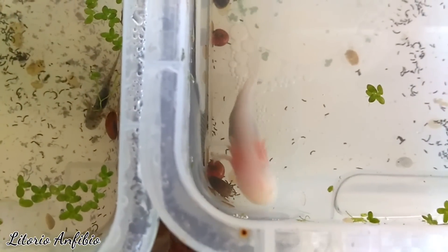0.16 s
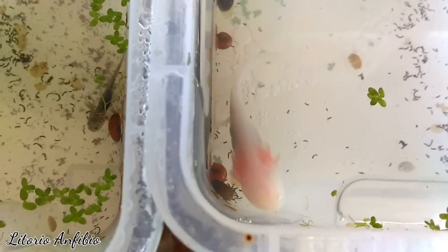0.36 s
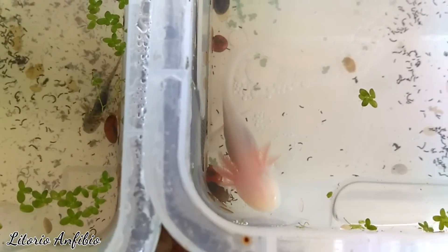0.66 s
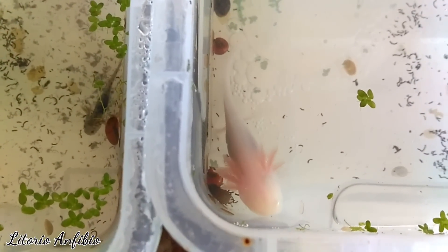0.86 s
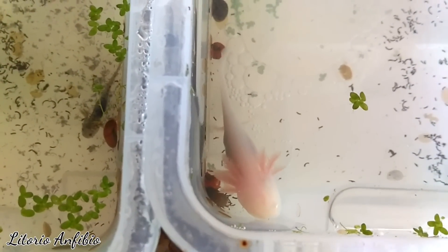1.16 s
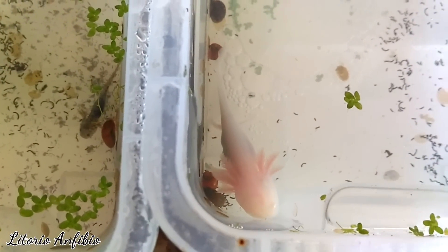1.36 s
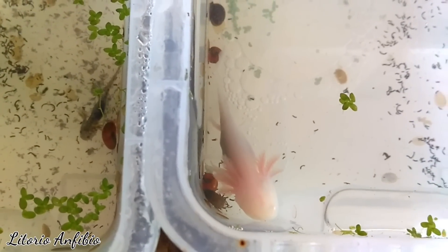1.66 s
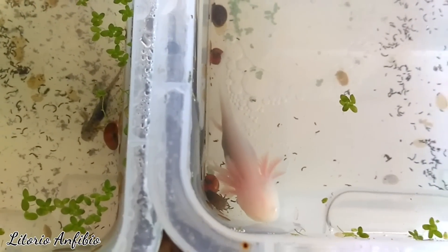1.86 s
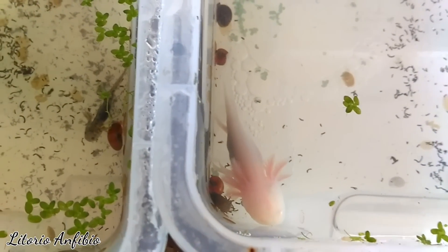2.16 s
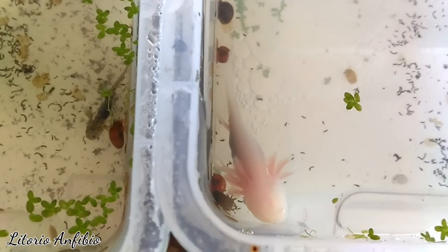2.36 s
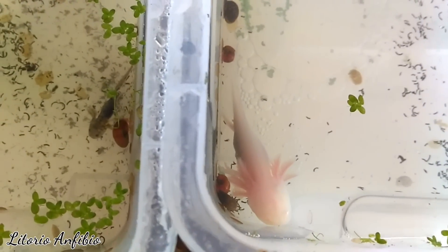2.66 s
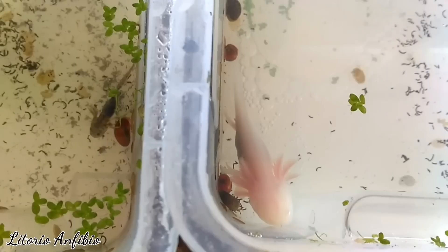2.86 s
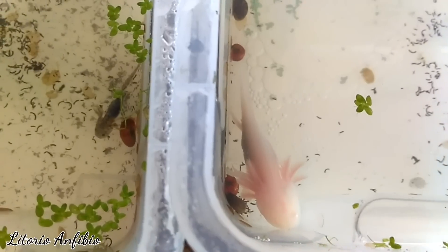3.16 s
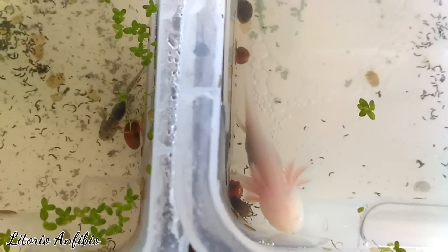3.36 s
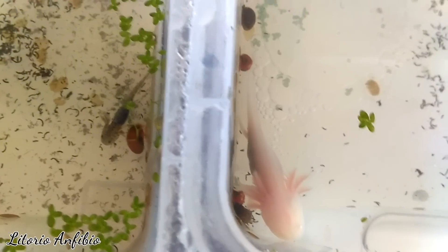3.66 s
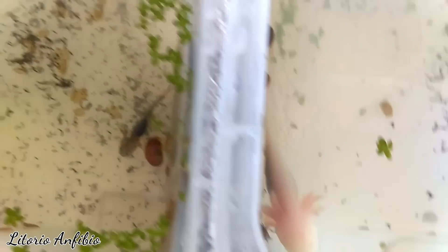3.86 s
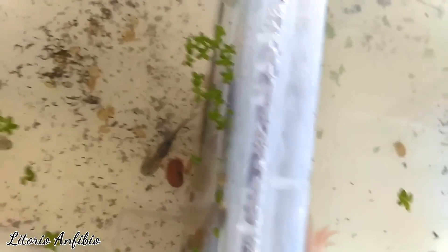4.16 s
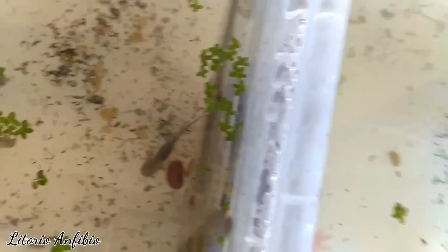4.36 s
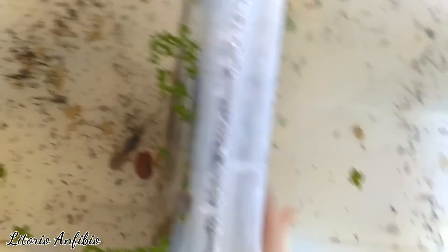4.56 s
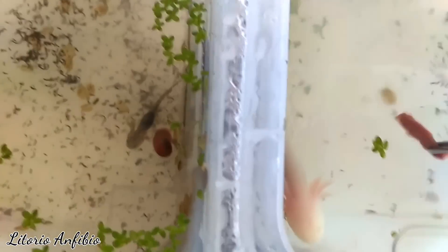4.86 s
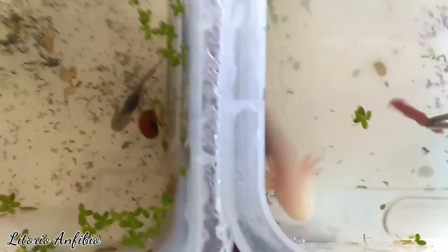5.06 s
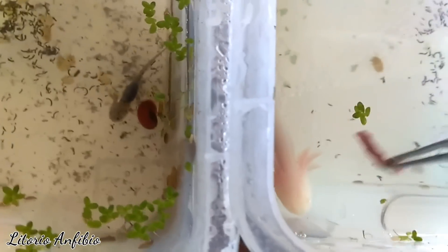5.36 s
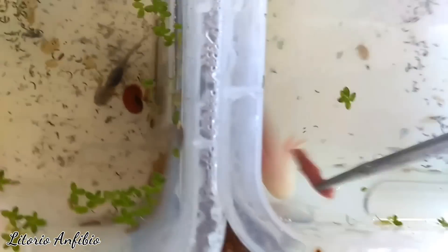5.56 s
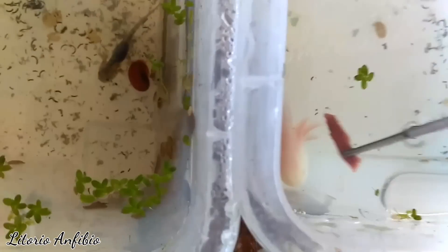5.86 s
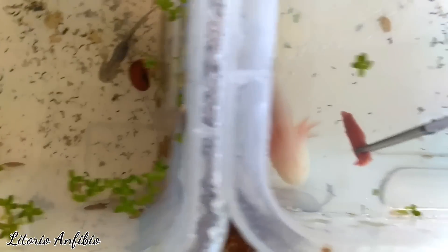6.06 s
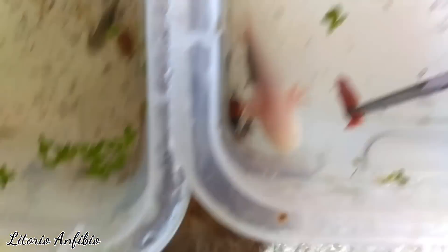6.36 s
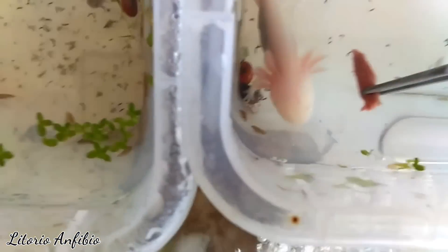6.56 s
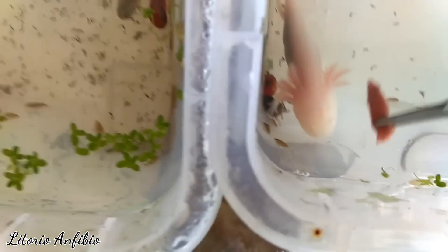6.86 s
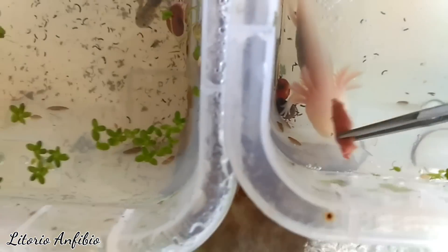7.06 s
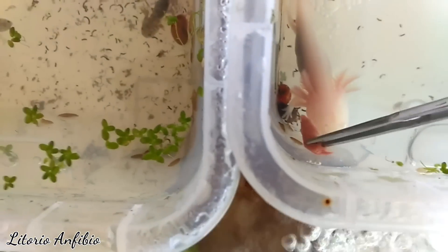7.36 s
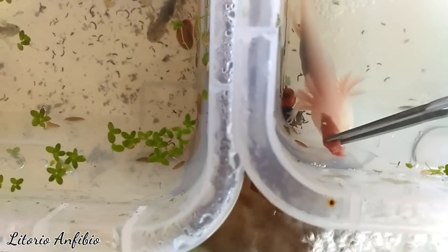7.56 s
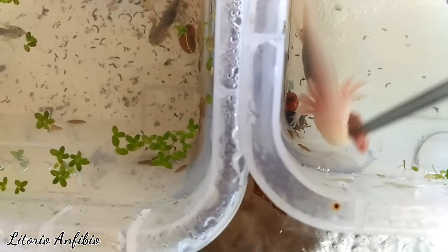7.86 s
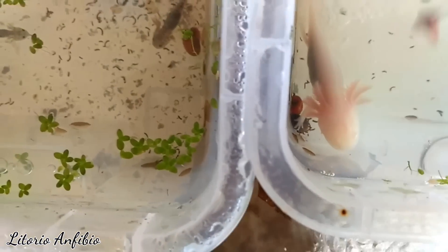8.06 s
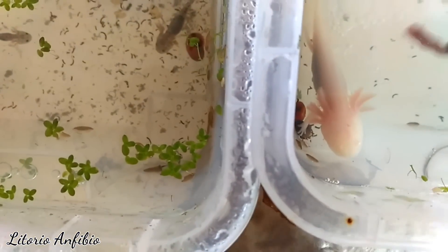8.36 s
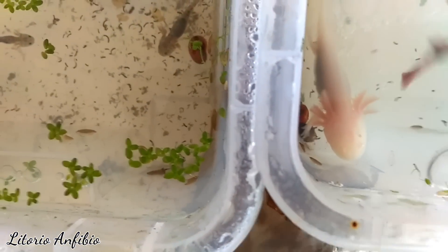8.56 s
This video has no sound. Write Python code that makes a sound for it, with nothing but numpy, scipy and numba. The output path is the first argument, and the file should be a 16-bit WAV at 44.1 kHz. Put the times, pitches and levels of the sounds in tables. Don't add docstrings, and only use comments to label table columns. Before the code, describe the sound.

Water trickles from a filter outlet into a small indoor tank for the whole 8.7 seconds, close to a hand-held phone with two microphones. It is a dense, lively burble: hollow glugs and higher plops ring at two recurring notes, with bright plinks that slide upward and crisp droplet ticks above. The flow comes in small irregular surges, with little deep bass and softened extreme treble. A very faint finger bump falls at about 0.8 s. At 3.6 s steel tweezers make a sharp, short clink, followed within 0.15 s by several much weaker bounces. The trickle continues, a little sparser until nearly 5 s, then busier. Dull low handling thumps come near 4.4 s and, strongest, 5.2 s, with a faint one at 7.5 s. A faint pump hum and quiet room air lie underneath, with a short, dull echo around the water, which runs on to the end.

```python
import sys
import numpy as np
from scipy import signal
from scipy.fft import rfft, irfft
from scipy.io import wavfile
from scipy.ndimage import uniform_filter1d, map_coordinates
from numba import njit

SR = 44100
rng = np.random.default_rng(int(sys.argv[2]) if len(sys.argv) > 2 else 0)


def persist_wave(psi):
    counts = np.round(np.clip(psi, -1, 1) * 32767).astype(np.int16)
    wavfile.write(sys.argv[1], SR, np.atleast_2d(counts).T)


def voltage_ratio(decibels):
    exponent = np.asarray(decibels, float) / 20
    return 10 ** exponent


N = 384552

# start in seconds, peak level in dB, pitch in Hz, time to fade by 60 dB in seconds.
EARLY_GLUGS = [(0.172, -38.5, 823, 0.087), (0.369, -30, 802, 0.055), (0.476, -39, 793, 0.064),
               (0.554, -36.5, 821, 0.18), (0.633, -40, 781, 0.15), (0.681, -33, 811, 0.045),
               (0.869, -42, 785, 0.053), (0.917, -54.5, 773, 0.046), (0.968, -35, 850, 0.043),
               (1.054, -42, 758, 0.15), (1.182, -35.5, 805, 0.036), (1.298, -35.5, 747, 0.079),
               (1.419, -40.5, 834, 0.035), (1.446, -35, 811, 0.11), (1.49, -31, 778, 0.16),
               (1.693, -36.5, 777, 0.023), (1.754, -34.5, 800, 0.034), (1.869, -37, 797, 0.066),
               (1.922, -34.5, 856, 0.061), (2.006, -46.5, 850, 0.099), (2.092, -40, 875, 0.027),
               (2.13, -37, 778, 0.047), (2.19, -33.5, 753, 0.05), (2.277, -44.5, 830, 0.078),
               (2.318, -39.5, 783, 0.19), (2.421, -33, 848, 0.1), (2.519, -32, 792, 0.12),
               (2.564, -39, 811, 0.086), (2.593, -39.5, 820, 0.051), (2.648, -47.5, 816, 0.06),
               (2.675, -41, 850, 0.06), (2.875, -35, 791, 0.062), (2.942, -33.5, 781, 0.032),
               (3.1, -52, 855, 0.07), (3.156, -41.5, 854, 0.064), (3.224, -43, 830, 0.074),
               (3.344, -34, 803, 0.047), (3.416, -40, 730, 0.099), (3.538, -36, 775, 0.07)]
LATE_GLUGS = [(3.716, -33.5, 806, 0.11), (3.973, -36.5, 761, 0.11), (4.117, -37, 800, 0.05),
              (4.284, -35.5, 791, 0.029), (4.417, -39.5, 778, 0.07), (4.644, -34.5, 817, 0.21),
              (4.739, -31.5, 810, 0.044), (4.778, -34, 820, 0.07), (4.816, -39.5, 764, 0.065),
              (4.878, -46.5, 825, 0.076), (4.972, -30.5, 759, 0.21), (5.087, -34, 750, 0.093),
              (5.198, -32, 753, 0.1), (5.371, -54, 765, 0.07), (5.526, -39.5, 740, 0.07),
              (5.569, -34.5, 835, 0.023), (5.786, -30.5, 852, 0.04), (5.975, -47, 885, 0.065),
              (5.998, -38, 764, 0.064), (6.035, -32, 764, 0.11), (6.1, -33.5, 799, 0.14),
              (6.14, -30.5, 837, 0.07), (6.261, -37, 775, 0.12), (6.387, -34.5, 756, 0.13),
              (6.455, -35.5, 752, 0.076), (6.524, -33, 818, 0.063), (6.599, -38, 819, 0.21),
              (6.652, -36, 790, 0.14), (6.784, -45, 787, 0.057), (6.813, -33.5, 779, 0.057),
              (6.875, -35.5, 876, 0.065), (6.947, -30.5, 777, 0.038), (6.999, -39, 755, 0.046),
              (7.126, -35.5, 820, 0.19), (7.175, -31, 806, 0.15), (7.215, -30.5, 783, 0.092),
              (7.328, -34.5, 783.4, 0.21), (7.355, -28, 775, 0.17), (7.48, -30.5, 782, 0.058),
              (7.609, -32.5, 806, 0.11), (7.757, -36, 802, 0.21), (7.897, -38, 760, 0.061),
              (7.959, -38, 777, 0.13), (8.022, -38.5, 770, 0.11), (8.125, -37, 780, 0.06),
              (8.171, -34, 799, 0.064), (8.204, -36.5, 758, 0.11), (8.247, -28, 792, 0.049),
              (8.368, -31.5, 810, 0.033), (8.476, -35, 802, 0.07)]
# start in seconds, peak level in dB, pitch in Hz.
EARLY_PLOPS = [(0.0998, -38.5, 1550), (0.161, -40, 1606), (0.257, -42, 1430), (0.599, -31.5, 1420),
               (0.6318, -31.5, 1524), (0.6816, -31.5, 1510), (0.8417, -37, 1400), (0.8908, -33, 1436),
               (0.9218, -36.5, 1470), (0.969, -40.5, 1540), (1.151, -36, 1404), (1.1816, -32, 1483),
               (1.297, -37, 1550), (1.4188, -31, 1386), (1.6905, -32, 1470), (1.7204, -26.5, 1493),
               (1.7507, -33.5, 1373), (1.919, -36, 1286), (2.0068, -43.5, 1740), (2.0672, -36, 1403),
               (2.1264, -30.5, 1457), (2.2184, -35, 1520), (2.3191, -38, 1460), (2.4174, -42, 1550),
               (2.5464, -35.5, 1382), (2.6329, -34.5, 1480), (2.692, -36.5, 1480), (2.7401, -34, 1486),
               (2.7751, -39.5, 1435), (2.84, -37.5, 1390), (2.8926, -29.5, 1430), (2.9936, -34, 1417),
               (3.1283, -39, 1563), (3.1644, -38.5, 1537), (3.4785, -38, 1433), (3.53, -35.5, 1440)]
LATE_PLOPS = [(3.664, -37, 1440), (3.7416, -35.5, 1470), (3.8544, -42.5, 1420), (4.002, -40.5, 1637),
              (4.02, -34, 1540), (4.171, -38, 1480), (4.7264, -39.5, 1493), (4.8151, -38.5, 1435),
              (4.908, -43.5, 1430), (4.967, -30, 1474), (4.9768, -31.5, 1440), (5.028, -33, 1440),
              (5.086, -42, 1384), (5.1066, -36, 1470), (5.2516, -42, 1475), (5.309, -35.5, 1530),
              (5.378, -46, 1520), (5.4312, -36, 1497), (5.5703, -35.5, 1470), (5.6725, -38, 1510),
              (5.7305, -38.5, 1510), (5.982, -35.5, 1505), (5.998, -32, 1470), (6.0498, -37, 1550),
              (6.0873, -38.5, 1540), (6.173, -37.5, 1552), (6.2088, -37.5, 1470), (6.395, -42.5, 1480),
              (6.4564, -42.5, 1354), (6.5242, -41, 1530), (6.649, -35.5, 1590), (6.7153, -31.5, 1350),
              (6.9725, -36.5, 1550), (7.041, -42, 1440), (7.2295, -35.5, 1520), (7.3298, -42.5, 1520),
              (7.6596, -40, 1550), (7.768, -32, 1480), (7.8818, -35.5, 1430), (8.0776, -37.5, 1400),
              (8.1242, -39, 1570), (8.1434, -39, 1485), (8.172, -39, 1460), (8.206, -35, 1430),
              (8.2423, -32, 1534), (8.4918, -33.5, 1473), (8.5217, -32, 1465), (8.597, -43, 1510)]
# start in seconds, peak level in dB, pitch in Hz.
EARLY_PLINKS = [(0.0834, -37.5, 2640), (0.1773, -35.5, 2250), (0.2572, -33.5, 2660), (0.3735, -33, 2840),
                (0.4873, -40, 2540), (0.6807, -36, 2200), (0.7736, -42, 2390), (1.2277, -54, 2860),
                (1.2421, -33, 2220), (1.392, -39.5, 2220), (1.6188, -41.5, 2220), (1.7878, -31, 2910),
                (1.8294, -38, 2400), (1.92, -38.5, 2610), (1.96, -44, 3350), (2.0786, -42.5, 3250),
                (2.2756, -40.5, 2320), (2.4207, -40.5, 2360), (2.4324, -33, 2660), (2.4516, -28, 2730),
                (2.5207, -33.5, 2210), (2.6539, -41.5, 2280), (2.8913, -43, 2280), (2.9338, -38.5, 2610),
                (3.1563, -39, 2600), (3.3025, -35.5, 1980), (3.4344, -39.5, 2680)]
LATE_PLINKS = [(3.9704, -38, 3430), (4.1959, -29.5, 2530), (4.47, -42, 3020), (4.5647, -45.5, 2150),
               (4.6323, -36.5, 2055), (4.7769, -32.5, 2175), (5.0229, -32.5, 2540), (5.0887, -38, 2340),
               (5.2418, -34, 2560), (5.401, -40, 2390), (5.4153, -27.5, 3010), (5.7844, -42.5, 2380),
               (5.9119, -36.5, 2280), (6.0072, -32, 2270), (6.2332, -26, 2740), (6.473, -32, 2190),
               (6.5023, -35, 2960), (6.5445, -40, 2200), (6.6, -39.5, 3080), (6.6123, -34, 2460),
               (6.6735, -39.5, 2520), (6.7091, -30.5, 2780), (6.7954, -31.5, 2630), (6.974, -30.5, 2680),
               (7.0065, -33, 2780), (7.0249, -34, 2660), (7.2117, -44, 2850), (7.2468, -29.5, 2650),
               (7.398, -41, 2650), (7.4596, -31, 2750), (7.5833, -30, 2740), (7.6623, -34.5, 2590),
               (7.7073, -34, 2510), (7.8082, -38, 3200), (7.8822, -38, 2500), (8.064, -31.5, 2740),
               (8.2758, -30.5, 2610), (8.3143, -34.5, 2500), (8.4901, -40, 2310), (8.6353, -37.5, 2320)]
# start in seconds, peak level in dB, pitch in Hz.
EARLY_TICKS = [(0.0563, -43.5, 4570), (0.099, -50, 4580), (0.145, -46.5, 5440), (0.366, -40, 3910),
               (0.566, -48.5, 3820), (0.6754, -34.5, 6730), (0.7562, -32, 4360), (0.9732, -28, 4260),
               (1.1205, -38.5, 4620), (1.2164, -46.5, 6900), (1.2356, -33.5, 7400), (1.3264, -33, 5250),
               (1.3603, -41, 4500), (1.3902, -43.5, 6500), (1.486, -42.5, 4600), (1.5324, -35, 5870),
               (1.6256, -48, 3850), (1.6975, -53, 4370), (1.7135, -38.5, 6400), (1.9619, -54, 3800),
               (2.0053, -41.5, 4070), (2.0358, -34.5, 6500), (2.2757, -46.5, 5080), (2.3999, -45.5, 4150),
               (2.4548, -48, 4730), (2.591, -46, 4600), (2.6333, -50.5, 7030), (2.6568, -48, 6600),
               (2.7212, -38.5, 5530), (2.8744, -50, 4500), (2.8923, -36, 4350), (2.9312, -33.5, 5980),
               (3.0804, -42, 4260), (3.2226, -49, 4100), (3.295, -48, 4350), (3.4675, -43, 4540)]
LATE_TICKS = [(3.896, -43.5, 5450), (3.9529, -54, 4000), (3.9718, -38.5, 3920), (4.0097, -33.5, 4170),
              (4.03, -44, 4140), (4.14, -47, 5840), (4.201, -46, 3760), (4.3739, -46.5, 4700),
              (4.4681, -36.5, 6040), (4.5337, -41.5, 3980), (4.6514, -42, 3700), (4.7248, -46.5, 5900),
              (4.8913, -44.5, 6700), (4.997, -45, 6300), (5.0868, -45, 6000), (5.2311, -33.5, 6920),
              (5.332, -56.5, 5760), (5.3993, -40, 4920), (5.4171, -26, 4120), (5.7033, -40, 5840),
              (5.7747, -43.5, 7000), (5.8887, -42, 4160), (5.9752, -38, 4320), (6.0137, -44, 3920),
              (6.123, -42, 5320), (6.1886, -43.5, 5350), (6.232, -41, 3900), (6.61, -46, 4560),
              (7.0815, -40, 5760), (7.252, -35.5, 3830), (7.5208, -43, 3770), (7.7595, -33.5, 4230),
              (7.8112, -38.5, 3700), (7.913, -51.5, 3920), (8.0825, -37, 3830), (8.1733, -39, 5900),
              (8.2865, -43.5, 5150), (8.313, -39, 6120), (8.4192, -40, 4640), (8.6313, -39.5, 5140)]
# start in seconds, peak level in dB, pitch in Hz.
STRAY_TICKS = [
    (0.005, -37, 5530),
    (3.7336, -31, 4280),
    (3.7335, -38, 2880),
]
# time in seconds, amount of flow in dB, height of fall in dB.
FLOW = [(0.0, -45.5, -1.5), (1.16, -49.5, 0.5), (1.29, -42, -2), (1.67, -51, 1), (2.72, -44.5, -1.5),
        (3.16, -50.5, 1.5), (3.59, -40, -3.5), (3.74, -48, 2.5), (4.66, -53.5, 1), (4.9, -46.5, 0),
        (5.95, -49, 1.5), (6.17, -49, 1.5), (6.7, -43, -3.5), (6.99, -48, 2), (7.38, -43, 0),
        (7.89, -44, -1), (8.18, -47, 0), (8.72, -44.5, 0.5)]
FOLLOWS_FLOW = (0.56, 1, 0.8, 0.17)
FOLLOWS_FALL = (-0.23, 0.52, 1.32, 2)
# pitch in Hz, width in Hz, level in dB.
AIR_SPACE = [(793.8, 52.4, 4), (908, 240, -14), (1397, 29, -2.5), (1470, 92.5, 3), (1550, 52, -7.5),
             (1753, 120, -8.5)]
# pitch in Hz, width in Hz, level in dB.
OVERTONES = [(2255, 20, -4), (2370, 19, -2), (2610, 60, -2.5), (2960, 230, -3.5), (3220, 230, 0.5)]
# frequency in Hz, level in dB per Hz.
SPLASH_COLOUR = [(1000, -40), (1700, -20.5), (1980, -8.5), (2230, -2.5), (2610, 0), (3370, -11.5),
                 (6720, -10), (7530, -15), (8050, -24.5), (8810, -8), (10200, -30), (13300, -97.5),
                 (22000, -120)]
# frequency in Hz, left minus right in dB.
PORT_DB = [(300, 2), (800, 3.5), (1100, 2), (1500, -5), (2000, -4), (3000, -1), (5500, 3), (9500, -1)]
# frequency in Hz, phase turn in radians.
PORT_TURN = [(250, 2.35), (860, 0.15), (1120, -1.9), (1640, -1.07), (1900, 1.7), (2200, 0.3), (2700, -2),
             (3500, 2), (5000, -5.5)]
# time in seconds, left minus right in dB.
HAND = [
    (0, -1.5),
    (1.5, -2),
    (3, -1),
    (4.5, -0.5),
    (6.5, -0.5),
    (7.3, 0.5),
    (8.2, 0),
    (8.72, -3.5),
]
# pitch in Hz, level in dB, time to fade by 60 dB in seconds.
STEEL = [(495, -17, 0.1), (689, -7, 0.14), (2099, -15, 0.061), (3246, -7, 0.075), (2557, -15, 0.054),
         (2686, -23, 0.073), (2875, -7, 0.021), (3321, 0, 0.067), (3935, -15, 0.032), (4301, -13, 0.062),
         (4775, -24, 0.052), (5082, -4, 0.031), (5448, 0, 0.042), (5755, -18, 0.051), (5949, -29, 0.068),
         (6790, -15, 0.035)]
# time in seconds, strength of the blow in dB.
CLINKS = [
    (3.5995, -22.5),
    (3.607, -48),
    (3.643, -37),
    (3.664, -42),
    (3.674, -49),
    (3.717, -43),
    (3.743, -43),
]
# start in seconds, peak level in dB, pitch in Hz,
# time to fade by 60 dB in seconds, left minus right in dB.
THUMPS = [
    (0.829, -65, 56.3, 0.12, 27),
    (4.369, -60, 62, 0.14, 15),
    (4.419, -70, 45, 0.19, 12),
    (5.225, -50, 112, 0.075, 15),
    (5.247, -55, 60, 0.18, 11),
    (7.539, -69, 75, 0.2, -28.5),
]
# pitch in Hz, level in dB rms.
HUM = [(100, -82.5), (150, -86), (200, -90.5), (250, -92), (300, -89.5), (500, -107.5)]
# frequency in Hz, level in dB per Hz.
ROOM_COLOUR = [(15, -47), (25, -14), (49, -11.5), (102, -2.5), (194, -9.5), (289, -5), (367, -10),
               (600, -4.5), (780, -29), (1320, -120)]


def level(x, db):
    return x * voltage_ratio(db) / np.sqrt(np.mean(x ** 2))


def colour(x, points):
    hz, db = np.transpose(points)
    bins = np.log(np.fft.rfftfreq(N, 1 / SR) + 1)
    return irfft(rfft(x) * voltage_ratio(np.interp(bins, np.log(hz), db)), N)


def band(x, lo_hz, hi_hz):
    return signal.sosfilt(signal.butter(2, [lo_hz, hi_hz], "bandpass", fs=SR, output="sos"), x)


def resonate(x, modes):
    out = 0
    for hz, width, db in modes:
        out = out + voltage_ratio(db) * signal.lfilter(*signal.iirpeak(hz, hz / width, SR), x)
    return out


@njit
def rings(s, size, hz, t60, rise, glide, pan, turn):
    out = np.zeros((2, N))
    for e in range(len(s)):
        first, n = int(s[e] * SR) + 1, int(t60[e] * SR)
        phase = 2 * np.pi * hz[e] * (first / SR - s[e])
        fade, fill = np.exp(-np.log(1000) / n), np.exp(-1 / (rise[e] * SR))
        env, empty = size[e], 1.
        for i in range(first, min(first + n, N)):
            env, empty = env * fade, empty * fill
            out[0, i] += env * (1 - empty) * pan[e] * np.sin(phase + turn[e])
            out[1, i] += env * (1 - empty) / pan[e] * np.sin(phase - turn[e])
            phase += 2 * np.pi * min(hz[e] * (1 + glide[e] * (i - first) / n), .45 * SR) / SR
    return out


def ring(s, db, hz, t60, rise, glide, pan_db=0, wander_s=0.):
    one = np.ones(len(s))
    hz, t60, rise = hz * one, np.clip(t60 * one, .003, .3), np.clip(rise * one, 1e-4, .02)
    known_hz, known_db = np.transpose(PORT_DB)
    port_db = np.interp(np.log(hz), np.log(known_hz), known_db)
    known_hz, known_turn = np.transpose(PORT_TURN)
    port_turn = np.interp(np.log(hz), np.log(known_hz), known_turn)
    turn = port_turn / 2 + np.pi * hz * wander_s * rng.standard_normal(len(s))
    ratio = rise * np.log(1000) / t60
    top = (ratio / (1 + ratio)) ** ratio / (1 + ratio)
    pan = voltage_ratio((port_db + pan_db) / 2)
    return rings(s * one, voltage_ratio(db) / top, hz, t60, rise, glide * one, pan, turn)


def room_tone():
    lean = voltage_ratio(np.array([[1.5], [-1.5]]))
    mid, side = rng.standard_normal((2, N))
    air = colour(mid * lean + 0.42 * side * np.array([[1], [-1]]), ROOM_COLOUR)
    t = np.arange(N) / SR
    wobble = 1 + 12 * uniform_filter1d(rng.standard_normal((len(HUM), N)), 4410, axis=1)
    hum = np.zeros(N)
    for k, (hz, db) in enumerate(HUM):
        hum += np.sqrt(2) * voltage_ratio(db) * wobble[k] * np.sin(2 * np.pi * hz * t + k)
    return level(air, -77) + hum * lean


def handling():
    s, db, hz, t60, pan_db = np.transpose(THUMPS)
    return ring(s, db, hz, t60, 0.0008, 0.0022, pan_db)


def tweezers():
    hz, db, t60 = np.transpose(STEEL)
    out, t = 0, np.arange(N) / SR
    crack_colour = [(20, 9), (6900, 1.5), (7400, -26), (22000, -47)]  # (Hz, dB)
    for s, blow_db in CLINKS:
        uneven_db = 2 * rng.standard_normal(len(hz)) - 3 * (hz > 4500) - 3 * (s > 3.62)
        near_hz = hz * (1 + .004 * rng.standard_normal(len(hz)))
        out = out + ring(s + 0 * hz, blow_db + db + uneven_db, near_hz, t60, .003, 0., 4., wander_s=4e-5)
        since = np.clip(t - s, 0, 1)
        crack = (np.exp(-since / .006) + .1 * np.exp(-since / .04)) * (t > s)
        crack = crack * (rng.standard_normal(N) + .5 * rng.standard_normal((2, N)))
        out = out + voltage_ratio(blow_db) * colour(band(crack, lo_hz=1200., hi_hz=6500.), crack_colour)
    s, db, hz = np.array([3.6, 3.6, 3.601]), np.array([-46., -48., -54.]), np.array([260., 150., 9250.])
    return out + ring(s, db, hz, t60=.08, rise=.002, glide=np.array([-.3, -.3, 0]))


def surges(floor_db=-33.0, hold_s=0.023):
    large = EARLY_GLUGS + LATE_GLUGS + EARLY_PLOPS + LATE_PLOPS + EARLY_PLINKS + LATE_PLINKS
    s, db = np.transpose([row[:2] for row in large])
    kicks = np.bincount((s * SR).astype(int), voltage_ratio(db), N)
    stirred = signal.lfilter([1], [1, -np.exp(-1 / (hold_s * SR))], kicks)
    stirred = np.log(uniform_filter1d(stirred, 441) + voltage_ratio(floor_db))
    chance = np.interp(np.arange(N), np.linspace(0, N, 300), rng.standard_normal(300))
    return 0.47 * (stirred - stirred.mean()) / stirred.std() + 0.43 * chance


def swarm(count, lo_hz, hi_hz, cycles, spread_db, glide, wander_s, surge, patchy_db):
    s, pitch, life, luck = rng.random((count, 4)).T
    hz = lo_hz * (hi_hz / lo_hz) ** pitch
    patches = map_coordinates(rng.standard_normal((141, 7)), [140 * s, 6 * pitch], order=1)
    size_db = -spread_db * np.log(1 - .99 * luck) + surge[(s * N).astype(int)]
    size_db = size_db + patchy_db * patches
    pan_db = 2 * rng.standard_normal(count)
    return ring(s * N / SR, size_db, hz, cycles * (.5 + life) / hz, 2 / hz, glide * life, pan_db, wander_s)


def stream():
    s, flow_db, fall_db = np.transpose(FLOW)
    t = np.arange(N) / SR
    flow_db = np.interp(t, s, flow_db - np.mean(flow_db))
    fall_db = np.interp(t, s, fall_db - np.mean(fall_db))
    low, mid, high, top = (voltage_ratio(a * flow_db + b * fall_db) for a, b in zip(FOLLOWS_FLOW, FOLLOWS_FALL))
    surge = surges()
    big = swarm(count=6000, lo_hz=693., hi_hz=1924., cycles=22., spread_db=2.8, glide=.09,
                wander_s=1e-5, surge=2.47 * surge, patchy_db=4.5)
    splash = swarm(count=5000, lo_hz=1700., hi_hz=4700., cycles=40., spread_db=3., glide=.12,
                   wander_s=5e-5, surge=3. * surge, patchy_db=3.)
    splash = colour(splash, SPLASH_COLOUR)
    splash = splash + voltage_ratio(2.0) * resonate(splash, OVERTONES)
    spray = swarm(count=20000, lo_hz=3300., hi_hz=7600., cycles=35., spread_db=3.2, glide=.1,
                  wander_s=5e-5, surge=2.5 * surge, patchy_db=2.5)
    mist = swarm(count=2500, lo_hz=7590., hi_hz=9900., cycles=90., spread_db=3., glide=.05,
                 wander_s=6e-5, surge=3. * surge, patchy_db=4.5)
    out = level(resonate(big, AIR_SPACE), -46.0) * low
    out = out + level(splash, -53.5) * mid
    out = out + level(colour(spray, SPLASH_COLOUR), -62.0) * high
    return out + level(colour(mist, SPLASH_COLOUR), -84.5) * top


def glugs():
    s, db, hz, t60 = np.transpose(EARLY_GLUGS + LATE_GLUGS)
    out = ring(s - .002, db - 0.5, hz, t60, rise=.002, glide=.03, wander_s=1e-5)
    return out + ring(s - .001, db - 21.5, 1.28 * hz, t60=.045, rise=.003, glide=.26, wander_s=1e-5)


def plops():
    s, db, hz = np.transpose(EARLY_PLOPS + LATE_PLOPS)
    return ring(s - .0015, db + 1, hz, t60=.044, rise=.0015, glide=.034, wander_s=2e-5)


def plinks():
    s, db, hz = np.transpose(EARLY_PLINKS + LATE_PLINKS)
    glide = np.clip(0.6 + 2.95 * (db + 30.5), .05, .9)
    return ring(s - .001, db - 0.5, hz * (1 - 0.17 * glide), 42 / hz, .0011, glide, wander_s=3e-5)


def ticks():
    s, db, hz = np.transpose(STRAY_TICKS + EARLY_TICKS + LATE_TICKS)
    out = ring(s - .0008, db - 0.5, 1.006 * hz, 40 / hz, rise=.0014, glide=.059, wander_s=6e-5)
    late, higher = rng.random((len(s), 8, 2)).T
    burst_s = (s + .003 * late).ravel()
    burst_hz = np.minimum(hz * (0.592 + 1.357 * higher), 9400.).ravel()
    burst_db = np.tile(db, 8) - 3.5 - 40.7 * np.abs(higher.ravel() - .3)
    return out + ring(burst_s, burst_db, burst_hz, 35 / burst_hz, rise=.0005, glide=.1, wander_s=5e-5)


def echoes(x):
    t60_s, wet_db = .2, -11
    t = np.arange(SR // 2) / SR
    tail = rng.standard_normal((2, len(t))) * voltage_ratio(-60 * t / t60_s) * (t > .003)
    tail = tail / np.sqrt(np.sum(tail ** 2, axis=1, keepdims=True))
    return voltage_ratio(wet_db) * signal.fftconvolve(band(x, lo_hz=100., hi_hz=6500.), tail, axes=1)[:, :N]


def scene():
    water = stream() + glugs() + plops() + plinks() + ticks()
    water = signal.sosfilt(signal.butter(14, 715, "highpass", fs=SR, output="sos"), water)
    turn_db = np.interp(np.arange(N) / SR, *np.transpose(HAND))
    near = water * voltage_ratio(np.array([turn_db, -turn_db]) / 2) + tweezers()
    return near + echoes(near) + handling() + room_tone()


def top_cut(x):
    return signal.sosfilt(signal.butter(12, 10390, fs=SR, output="sos"), x)


def record(dry):
    dull = signal.sosfilt(signal.butter(6, 9300., fs=SR, output="sos"), dry)
    return top_cut(dull)


dry = scene()
out = record(dry)
persist_wave(out)
```